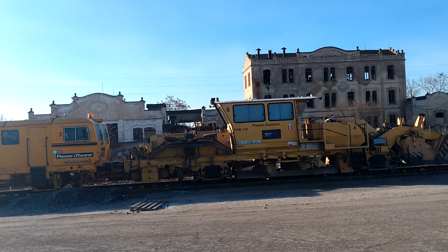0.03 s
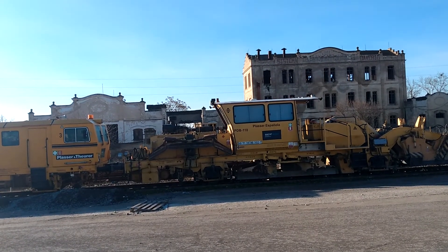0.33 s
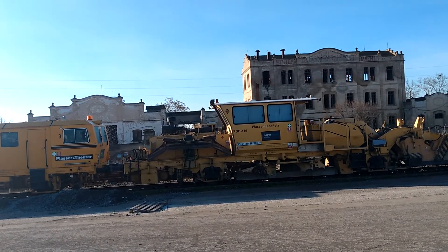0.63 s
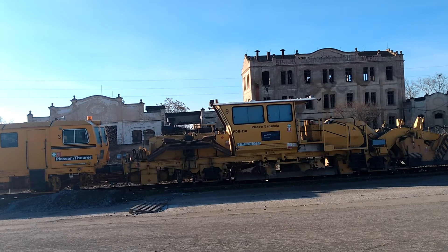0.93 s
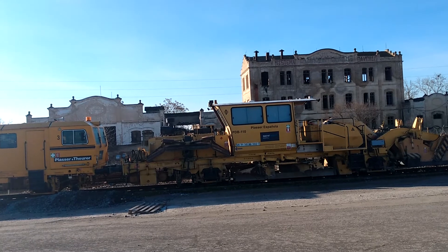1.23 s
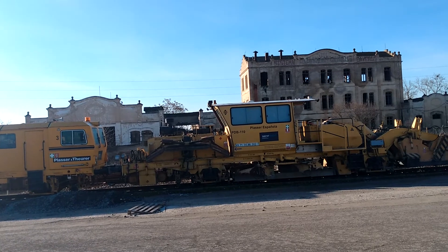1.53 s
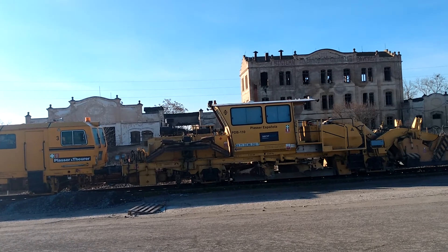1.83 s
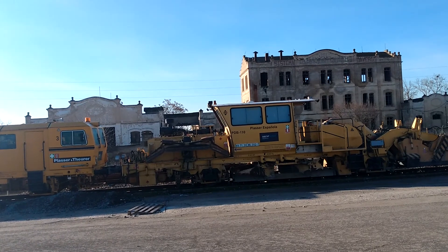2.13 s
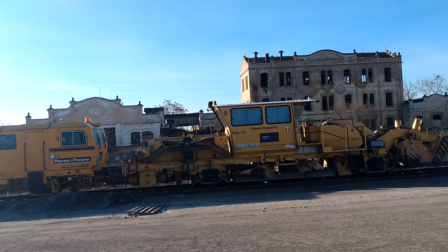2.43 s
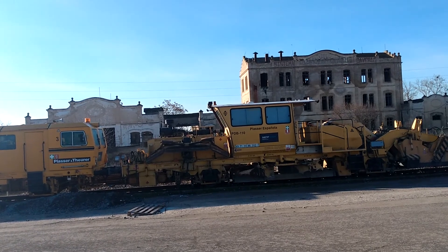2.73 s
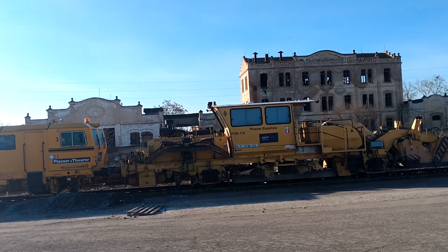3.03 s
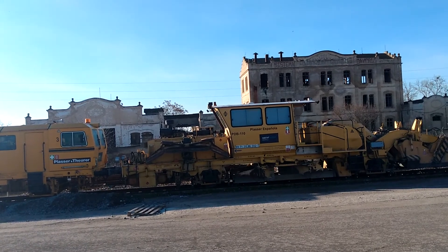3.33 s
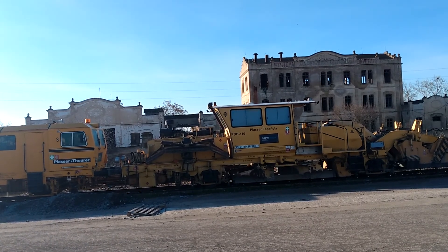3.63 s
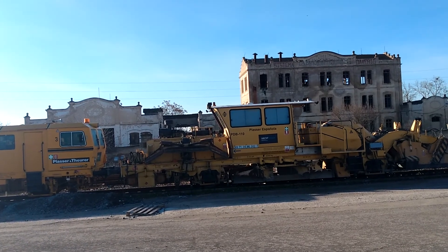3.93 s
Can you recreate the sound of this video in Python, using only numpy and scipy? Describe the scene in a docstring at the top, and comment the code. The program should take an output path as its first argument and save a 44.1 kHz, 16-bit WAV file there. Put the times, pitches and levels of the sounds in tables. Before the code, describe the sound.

A heavy diesel track machine idles some way off outdoors, with a knocking clatter, low hum and faint whine. Wind buffets the microphone throughout, rumbling, fluttering and thumping more strongly toward the end.

```python
"""Outdoors in rising wind, some way from a heavy diesel track machine at idle.
Firing knock rings in its panels over a low exhaust hum and gear whines.
Wind buffets a closely spaced microphone pair, pushing the two channels in opposite directions:
a rumble, a tearing flutter in each gust and hard thumps where single eddies hit one port."""
import sys
import numpy as np
from scipy import signal
from scipy.fft import rfft, irfft, next_fast_len
from scipy.io import wavfile
from scipy.ndimage import uniform_filter1d, minimum_filter1d, map_coordinates

SR = 44100
rng = np.random.default_rng(int(sys.argv[2]) if len(sys.argv) > 2 else 0)


def master_out(mix):
    """Clip the mix to full scale and print it as 16-bit PCM to the path in sys.argv[1]."""
    frames = np.transpose(np.atleast_2d(mix))
    ceiling = np.clip(frames, -1, 1)
    pcm = np.round(ceiling * 32767).astype(np.int16)
    wavfile.write(sys.argv[1], SR, pcm)


N = 176400

CYCLE_HZ, CYLINDERS = 5.82, 11  # four-stroke cycles a second, firings in each
RUMBLE_TRIM_DB, GUST_SAMPLES = -1, 16384

# Engine level, with brief dips. Each row: time in seconds, gain in dB.
ENGINE_GAIN_DB = [(0, -0.5), (.85, -1.5), (.89, -5.5), (1.02, -4), (1.24, -0.5), (2.08, -1), (2.15, -3.5),
                  (2.3, -2), (3.02, -1.4), (3.08, -6.5), (3.35, -3.5), (3.55, -3), (3.68, -7), (3.85, -4),
                  (4, -3.5)]
# Clatter spectrum. Each row: frequency in Hz, relative density in dB.
CLATTER_SPECTRUM_DB = [(30, -27), (60, 1), (130, -3), (300, -7.5), (450, -6.5), (680, -5), (900, -8),
                       (1150, -12), (1500, -13), (1850, -9), (2200, -20), (2700, -24.5), (3300, -30),
                       (4300, -30.5), (5000, -35), (6500, -42.5), (8000, -42.5), (11000, -49), (15000, -51)]
# Panel and pipe resonances. Each row: centre in Hz, width in Hz, lift in dB.
PANEL_MODES = [(553, 45, 6.5), (660, 38, 5.5), (784, 62, 9.5), (1040, 93, 1.5), (1419, 120, 4),
               (1640, 50, -1), (2580, 260, 6), (3730, 390, 3.5), (6000, 64, 11)]
# Exhaust hum and gear whines. Each row: frequency in Hz, level in dB before the engine gain.
SHAFT_TONES = [(69.8, -40), (139.6, -46), (297, -50), (523, -49.5), (546, -46), (759, -48.5), (778, -51),
               (803, -51), (832, -54), (872, -55), (974, -54), (1028, -53), (1126, -56.5), (1428, -56),
               (1636, -61), (1670, -62), (1766, -63), (1984, -70), (2556, -72.5), (3284, -78)]
# Clatter paths: direct to side, scattered to side, filling the mid's nulls.
# Each row: frequency in Hz, gain in dB.
DIRECT_SIDE_DB = [(100, 3), (1100, 3), (1800, -9), (4300, 2.5), (12000, -1.5)]
SCATTER_SIDE_DB = [(100, -4.5), (500, -9), (1100, -10.5), (2000, -1), (3300, -19.5), (6000, -4),
                   (14000, -11)]
NULL_FILL_DB = [(2200, -12.5), (4400, -34.5), (6600, -31), (12000, -16.5)]
# Clatter balance. Each row: frequency in Hz, left over right in dB.
LEAN_LEFT_DB = [(300, 12), (1000, 1), (2000, 4), (4000, 0.5), (8000, 2), (12000, 2.5)]
# Gusts. Each row: centre in seconds, half length in seconds, rumble in dB before trim,
# flutter in dB, eddy pitch in Hz.
GUST_EVENTS = [ (0.033, .016, -15.5, -29, 170), (.07, 0.0056, -14.5, -29, 149),
               (.123, 0.0041, -12.5, -30, 150), (.218, 0.011, -16.5, -27.5, 210),
               (.463, 0.0094, -17, -26, 250), (.551, 0.013, -8.5, -23.5, 229),
               (0.595, 0.007, -10.5, -29, 280), (0.662, .018, -15, -30, 220),
               (0.704, 0.019, -24, -26.5, 200), (0.855, 0.0057, -13, -16, 230),
               (1.118, .022, -24.5, -28, 380), (1.278, 0.013, -16, -27.5, 210),
               (1.35, 0.024, -16.5, -25, 288), (1.373, 0.0057, -24, -20, 298),
               (1.412, 0.0056, -12, -16.5, 290), (1.793, 0.0051, -9.5, -25, 180),
               (1.865, 0.0078, -18.5, -19.5, 300), (1.905, 0.018, -12.5, -20, 262),
               (1.975, 0.0053, -6.5, -26, 200), (2.018, 0.0099, -17, -26.5, 325),
               (2.088, 0.009, -7.5, -20.5, 220), (2.135, .008, -10.5, -32, 200),
               (2.221, 0.014, -11.5, -22, 198), (2.295, 0.013, -27, -19.5, 426),
               (2.338, 0.014, -13.5, -20.5, 330), (2.386, 0.021, -14.5, -19, 432),
               (2.422, 0.0031, -13, -25, 224), (2.484, 0.015, -12.5, -20, 260),
               (2.558, 0.007, -13, -17.5, 466), (2.592, 0.0083, -15.5, -21, 280),
               (2.617, 0.0072, -12, -17.5, 180), (2.638, 0.0048, -9, -19, 560),
               (2.727, 0.0072, -10, -25.5, 200), (2.838, 0.023, -11.5, -22.5, 340),
               (2.866, 0.0063, -9, -21, 230), (2.901, 0.0084, -11, -21.5, 334),
               (2.968, 0.013, -12.5, -19, 408), (3.028, .013, -8.5, -18.5, 500),
               (3.065, 0.0081, -8.5, -16, 272), (3.202, 0.0083, -13, -21, 536),
               (3.268, 0.0067, -12, -27, 280), (3.304, 0.0033, -10, -19, 620),
               (3.321, 0.012, -11.5, -18, 350), (3.346, .005, -9, -36, 150),
               (3.408, 0.0037, -8, -24.5, 250), (3.47, 0.025, -12.5, -19, 450),
               (3.504, 0.0046, -25, -20, 200), (3.525, 0.0063, -7.5, -14, 283),
               (3.589, 0.0059, 0, -10.5, 252), (3.604, 0.009, -19, -16.5, 653),
               (3.621, .009, -10.5, -16.5, 495), (3.775, 0.017, -22, -22.5, 357),
               (3.805, 0.016, -14, -16.5, 520), (3.869, 0.013, -19.5, -21, 623),
               (3.912, 0.01, -13.5, -20.5, 380), (3.947, 0.0053, -12, -20, 704),
               (3.98, 0.01, -7.5, -21.5, 430)]
# Single eddies. Each row: centre in seconds, peak in dB, width in seconds, port (0 left, 1 right).
THUMP_EVENTS = [ (.5935, -12, .0013, 0), (.8505, -9, .002, 1), (.863, 1, .0009, 1), (1.4127, -7, .0014, 0),
                (1.8638, -11, .0012, 1), (2.0884, -6, .0013, 1), (2.1317, -3, .0011, 0),
                (2.379, -6, .0008, 1), (2.588, -6, .001, 0), (2.6386, -6, .0006, 0), (2.7262, -1, .001, 1),
                (2.839, -7, .0008, 0), (3.021, -7, .0006, 0), (3.063, -6, .001, 0), (3.3154, -5, .0009, 1),
                (3.4055, -3, .0012, 1), (3.4797, -6, .001, 1), (3.5853, -3, .0007, 1),
                (3.6171, -4, .0006, 1), (3.7979, -5, .0009, 1), (3.9474, -6, .0007, 1)]
# Rumble between gusts. Each row: time in seconds, level in dB before trim.
BREEZE_DB = [(0, -22), (.22, -21), (.35, -25.5), (.5, -27.5), (.62, -22.5), (.8, -19.5), (.92, -22.5),
             (1.02, -23.5), (1.1, -18), (1.35, -23), (1.48, -23.5), (1.66, -24), (1.8, -19), (2.4, -19),
             (3.0, -18), (3.22, -18), (3.55, -17), (4.0, -14.5)]
# Wind spectra. Each row: frequency in Hz, relative density in dB.
RUMBLE_SPECTRUM_DB = [(20, -58), (32, -34), (40, -19.5), (50, -3.5), (66, -1.5), (120, 0), (200, -6),
                      (300, -15), (500, -33.5), (750, -48.5), (1200, -62.5), (3000, -96)]
FLUTTER_SPECTRUM_DB = [(60, -33.5), (150, 0.5), (260, 3), (500, -6), (750, -12), (1100, -20.5), (1500, -29),
                       (2200, -44.5), (4000, -71), (8000, -80.5), (15000, -100)]
# Wind width. Each row: frequency in Hz, side over mid in dB.
RUMBLE_SIDE_DB = [(50, 23), (110, 15.5), (200, 10.5), (400, 12.5)]
FLUTTER_SIDE_DB = [(150, 12.5), (350, 3), (600, -3), (1100, -18), (1800, 7)]


def engine(drift=0.002024):
    """Clatter and tones locked to one slightly unsteady shaft."""
    shaft_s = np.cumsum(1 + drift * wobble(3)) / SR
    return amp(curve(ENGINE_GAIN_DB)) * (amp(-32.5) * clatter(shaft_s) + hum_and_whine(shaft_s))


def knocks(cycles, decay_s=.005, depth=.19, spread_db=7, repeat_share=0.27):
    """Whirr struck by every firing; each cylinder has its own strength and signature."""
    firing = cycles * CYLINDERS
    strength = amp(spread_db * rng.standard_normal(64))[firing.astype(int) % CYLINDERS]
    age_s = firing % 1 / (CYCLE_HZ * CYLINDERS)
    signature = map_coordinates(rng.standard_normal(SR), [cycles % 1 * SR / CYCLE_HZ])
    whirr = np.sqrt(repeat_share) * signature + np.sqrt(1 - repeat_share) * rng.standard_normal(N)
    return whirr * (1 + depth * strength * np.exp(-age_s / decay_s))


def panels(hz):
    """Gain of the engine body with its ringing panels and pipes."""
    lift_db = sum(db / (1 + (2 * (hz - mode_hz) / width_hz) ** 2) for mode_hz, width_hz, db in PANEL_MODES)
    return amp(along(CLATTER_SPECTRUM_DB, hz) + lift_db)


def clatter(shaft_s, null_hz=2205):
    """Knocks through the panels, rms 1; the delay between ports combs mid and side in turn."""
    direct, fill, scatter = (knocks(shaft_s * CYCLE_HZ) for _ in range(3))
    comb_rad = lambda hz: np.pi * np.maximum(hz / null_hz, .5)
    path = lambda table, hz: panels(hz) * amp(along(table, hz))
    mid = filtered(direct, lambda hz: 1j * np.sin(comb_rad(hz)) * panels(hz))
    mid += filtered(fill, lambda hz: path(NULL_FILL_DB, hz))
    side = filtered(direct, lambda hz: -np.cos(comb_rad(hz)) * path(DIRECT_SIDE_DB, hz))
    side += filtered(scatter, lambda hz: path(SCATTER_SIDE_DB, hz))
    lean = lambda hz: amp(np.outer([.5, -.5], along(LEAN_LEFT_DB, hz)))
    return unit(filtered(left_right(mid, side), lean))


def hum_and_whine(shaft_s, waver_db=6, smear_rad=0.96):
    """Exhaust and gear tones, wavering in level and phase."""
    out = np.zeros(N)
    for hz, db in SHAFT_TONES:
        waver = amp(waver_db * wobble(14))
        phase_rad = 2 * np.pi * hz * shaft_s + smear_rad * wobble(20)
        out += amp(db) * unit(waver * np.sin(phase_rad))
    return out


def gusts(hump_lift_db=6, hump_octaves=0.6):
    """Each gust: a low shove and a flutter lifted around the pitch of its eddies."""
    out = np.zeros((2, N + 2 * GUST_SAMPLES))
    hz = np.fft.rfftfreq(GUST_SAMPLES, 1 / SR)
    for centre_s, half_s, rumble_db, flutter_db, eddy_hz in GUST_EVENTS:
        hump_db = hump_lift_db * np.exp(-(np.log2((hz + 1) / eddy_hz) / hump_octaves) ** 2)
        shove = swirl(half_s, hz, along(RUMBLE_SPECTRUM_DB, hz), RUMBLE_SIDE_DB, lump_db=-1.0)
        flutter = swirl(half_s, hz, along(FLUTTER_SPECTRUM_DB, hz) + hump_db, FLUTTER_SIDE_DB, lump_db=3.5)
        gust = amp(RUMBLE_TRIM_DB + rumble_db) * shove + amp(flutter_db) * flutter
        start = round(centre_s * SR)
        out[:, start:start + GUST_SAMPLES] += gust
    return out[:, GUST_SAMPLES // 2:][:, :N]


def swirl(half_s, hz, spectrum_db, side_table, lump_db):
    """One swell of lumpy pressure on both ports, rms about 1 at its height."""
    t = (np.arange(GUST_SAMPLES) - GUST_SAMPLES / 2) / SR
    swell = np.exp(-(t / half_s) ** 2 / 2)
    eddies = rng.standard_normal((2, GUST_SAMPLES)) * swell * amp(lump_db * wobble(299.3, GUST_SAMPLES))
    colour = amp(spectrum_db) * mid_side_gains(side_table, hz)
    mid_side = irfft(rfft(eddies) * colour)
    target_norm = np.linalg.norm(swell) * np.linalg.norm(colour, axis=1) / np.linalg.norm(colour)
    mid_side *= (target_norm / np.linalg.norm(mid_side, axis=1))[:, None]
    return left_right(*mid_side)


def thumps(bleed=.2, tick_db=-53, tick_slope=3, tick_decay_s=.0004):
    """An eddy hits one port: a push between two shallow sucks, with a faint tick on the hardest."""
    out = np.zeros((2, N))
    for centre_s, db, width_s, port in THUMP_EVENTS:
        t = np.arange(N) / SR - centre_s
        widths = t / width_s
        push = amp(db) * (1 - 2 * widths ** 2) * np.exp(-widths ** 2)
        tick = amp(tick_db + tick_slope * db) * np.exp(-np.abs(t) / tick_decay_s) * rng.standard_normal(N)
        out += np.outer([-bleed, 1] if port else [1, -bleed], push + tick)
    return out


def breeze(knee_db=-19.5, flutter_offset_db=-13, flutter_slope=1.9):
    """Rising flow; its tearing flutter grows faster than its rumble."""
    flow_db = curve(BREEZE_DB) + 0.74 * wobble(35)
    flutter_db = knee_db + flutter_offset_db + flutter_slope * (flow_db - knee_db)
    rumble = turbulence(RUMBLE_SPECTRUM_DB, RUMBLE_SIDE_DB, lump_db=1.5, lump_hz=77)
    flutter = turbulence(FLUTTER_SPECTRUM_DB, FLUTTER_SIDE_DB, lump_db=4.0, lump_hz=300)
    return amp(RUMBLE_TRIM_DB + flow_db) * rumble + amp(flutter_db) * flutter


def turbulence(spectrum_table, side_table, lump_db, lump_hz):
    """Lumpy pressure noise on both ports, rms 1."""
    eddies = rng.standard_normal((2, N)) * amp(lump_db * wobble(lump_hz))
    colour = lambda hz: amp(along(spectrum_table, hz)) * mid_side_gains(side_table, hz)
    return unit(left_right(*filtered(eddies, colour)))


def mid_side_gains(side_table, hz):
    """Constant-power split into mid and side."""
    angle_rad = np.arctan(amp(along(side_table, hz)))
    return np.array([np.cos(angle_rad), np.sin(angle_rad)])


def left_right(mid, side):
    """Mid and side to two channels."""
    return np.array([mid + side, mid - side])


def amp(db):
    """dB to gain."""
    return 10 ** (np.asarray(db) / 20)


def unit(x):
    """Scale to rms 1."""
    return x / np.sqrt(np.mean(x ** 2) + 1e-20)


def along(table, hz):
    """Interpolate (Hz, value) rows on a log axis."""
    knots_hz, values = np.transpose(table)
    return np.interp(np.log(hz + 1), np.log(knots_hz + 1), values)


def curve(table):
    """Interpolate (s, value) rows per sample."""
    return np.interp(np.arange(N) / SR, *np.transpose(table))


def wobble(knot_hz, size=N):
    """Smooth random curve."""
    return map_coordinates(rng.standard_normal(4096), [np.arange(size) * knot_hz / SR], mode="wrap")


def filtered(x, response):
    """Apply a complex frequency response."""
    size = next_fast_len(N + SR // 2)
    return irfft(rfft(x, size) * response(np.fft.rfftfreq(size, 1 / SR)), size)[..., :N]


def scene():
    """The idling machine behind the wind."""
    return engine() + breeze() + gusts() + thumps()


def record(dry, ceiling=1.0, react_s=.0025, fade_s=.004, top_hz=15500):
    """Fast peak limiter, end fades, low-pass."""
    size = round(react_s * SR)
    gain = minimum_filter1d(ceiling / np.maximum(np.abs(dry).max(0), ceiling), 2 * size)
    gain = uniform_filter1d(uniform_filter1d(gain, size), size)
    fades = signal.windows.tukey(N, 2 * fade_s * SR / N)
    lowpass = signal.ellip(10, .1, 80, top_hz, fs=SR, output="sos")
    return signal.sosfilt(lowpass, dry * gain * fades)


dry = scene()
out = record(dry)
master_out(out)
```